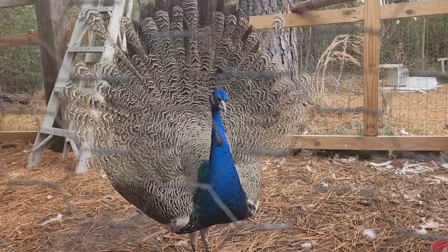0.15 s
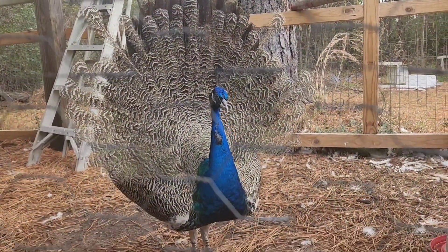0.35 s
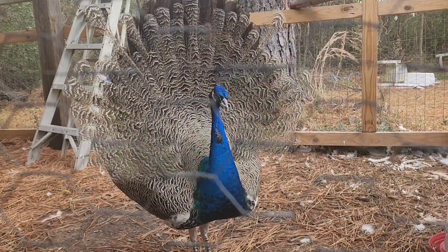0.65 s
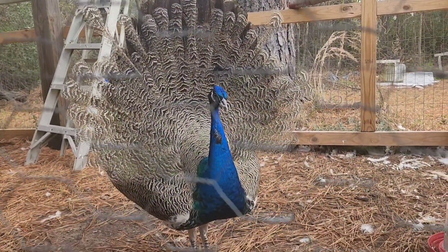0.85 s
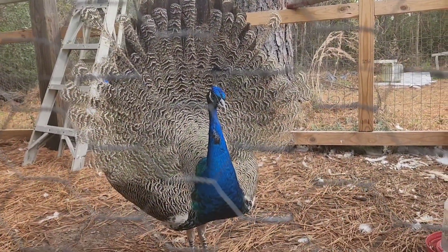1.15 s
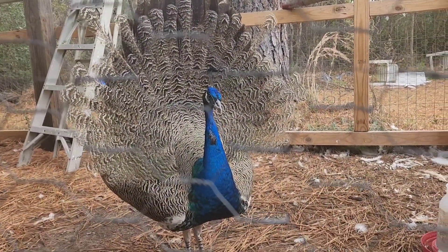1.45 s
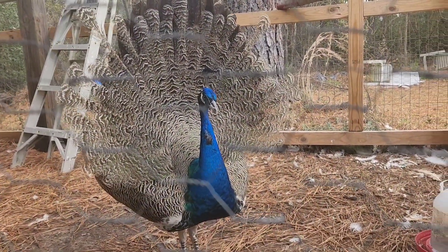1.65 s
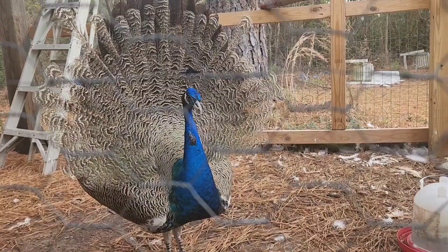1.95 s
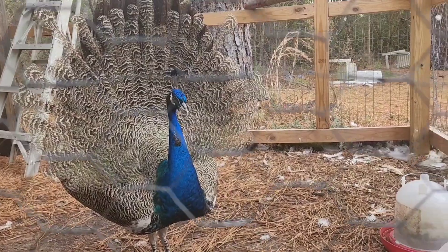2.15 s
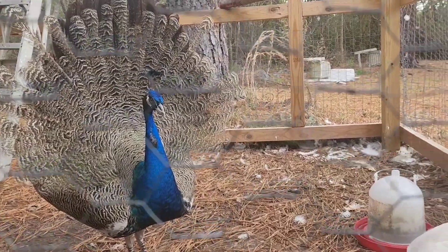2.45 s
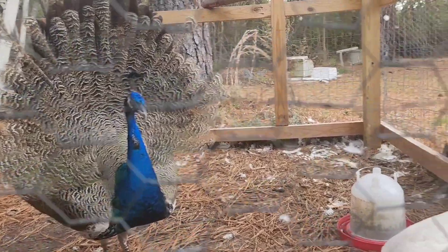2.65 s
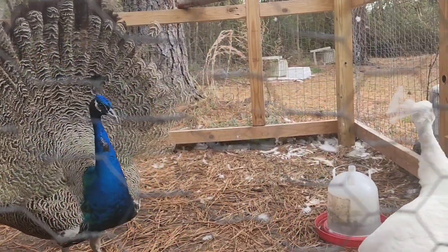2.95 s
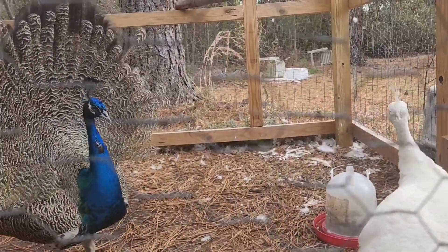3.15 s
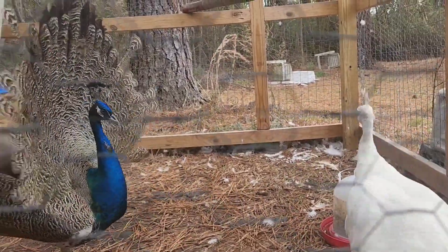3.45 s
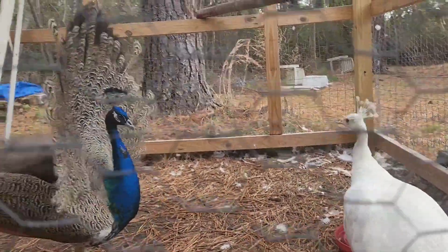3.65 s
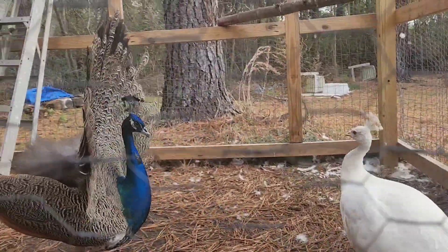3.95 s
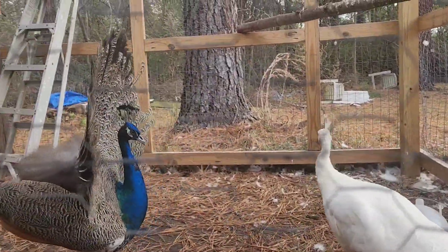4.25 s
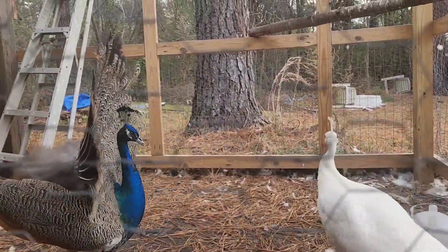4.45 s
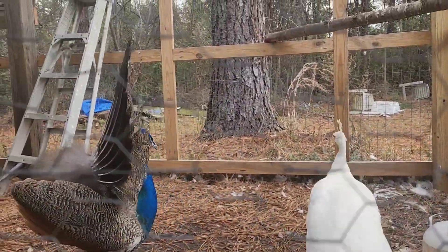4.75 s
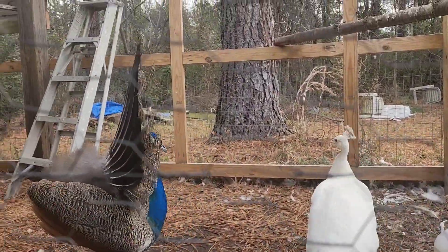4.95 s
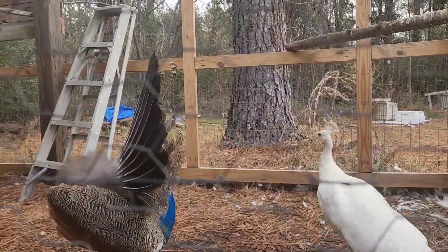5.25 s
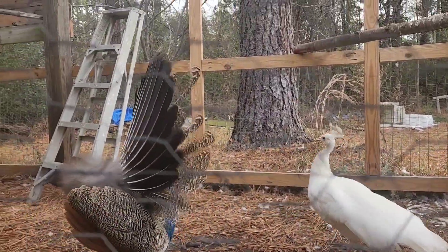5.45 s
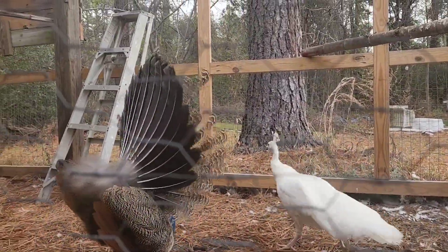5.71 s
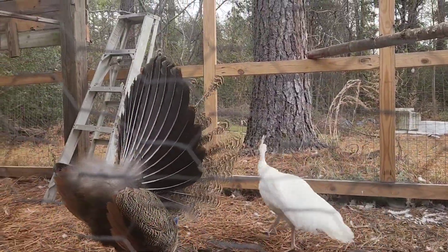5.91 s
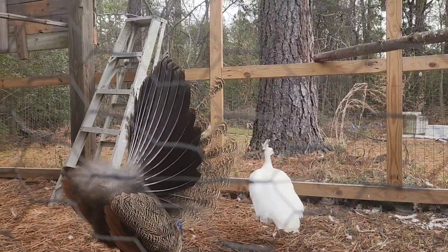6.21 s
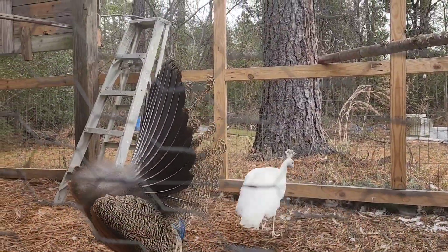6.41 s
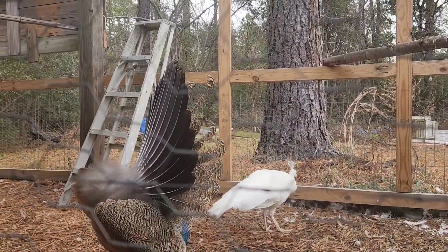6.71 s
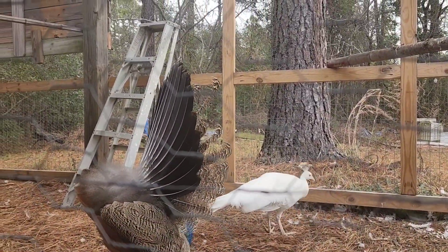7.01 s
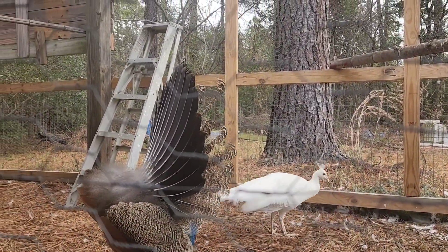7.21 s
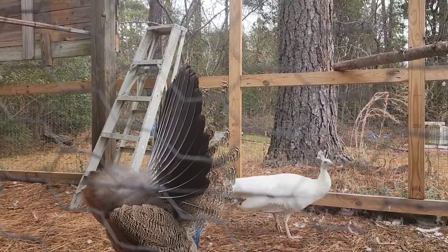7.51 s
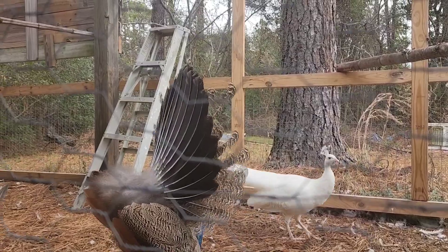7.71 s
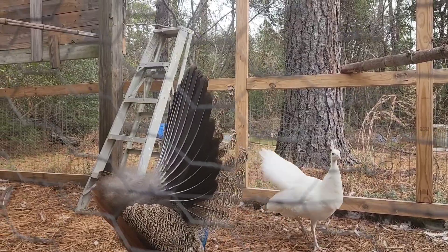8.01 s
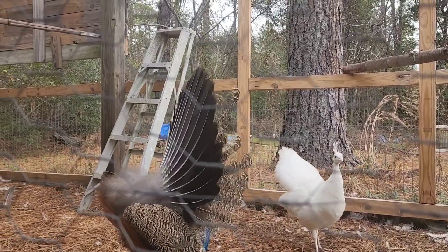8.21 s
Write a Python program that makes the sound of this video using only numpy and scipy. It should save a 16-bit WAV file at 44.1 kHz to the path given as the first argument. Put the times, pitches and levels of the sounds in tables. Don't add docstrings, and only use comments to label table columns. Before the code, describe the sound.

Close soft clucking in an outdoor pen leads to a raspy drawn-out groan and shaken feathers, followed by thin distant chirps and engine drone.

```python
import sys
import numpy as np
from scipy import signal
from scipy.io import wavfile

SR = 44100
rng = np.random.default_rng(int(sys.argv[2]) if len(sys.argv) > 2 else 0)


def waveform_to_disk(signal):
    frames = np.transpose(np.atleast_2d(signal))
    scaled = np.clip(frames, -1, 1) * 32767
    samples = np.round(scaled).astype(np.int16)
    wavfile.write(sys.argv[1], SR, samples)


def volts(x):
    e = np.asarray(x, float) / 20
    return 10 ** e


N = 369116


def rms_one(x):
    return x / np.sqrt(np.mean(x ** 2) + 1e-20)


def in_time(rows, t):
    s, *columns = np.transpose(rows)
    return [np.interp(t, s, column) for column in columns]


def at_hz(points, hz):
    points_hz, values = np.array(points).T
    return np.interp(np.log(hz), np.log(points_hz + 1), values)


def drift(rate, size=N):
    r = np.exp(-80 * np.pi * rate / SR)
    slow = signal.lfilter([1], [1, -2 * r, r * r], rng.standard_normal(size // 40 + 1002))
    settled = rms_one(slow)[1000:]
    return np.interp(np.arange(size) / 40, np.arange(len(settled)), settled)


def resonate(x, hz, width_hz):
    r = np.exp(-np.pi * width_hz / SR)
    gain = (1 - r * r) / 2
    return signal.lfilter(np.array([1, 0, -1]) * gain, [1, -2 * r * np.cos(2 * np.pi * hz / SR), r * r], x)


def add(out, s, sound, pan_db):
    i = max(round(s * SR), 0)
    size = min(len(sound), N - i)
    sides = volts(np.multiply.outer([.5, -.5], pan_db + 0 * sound))
    out[:, i:i + size] += (sound * sides)[:, :size]


def bouts(rows, t, rest_db, rise_db_per_s, fall_db_per_s):
    s, hold, db = np.transpose(rows)[:, :, None]
    rise = rise_db_per_s * np.maximum(s - t, 0)
    fall = fall_db_per_s * np.maximum(t - s - hold, 0)
    return np.maximum((db - rise - fall).max(axis=0), rest_db)


def glides(rows, swell_db, skew, bend=1):
    u = np.linspace(0, 1, num=6)
    arch_db = swell_db * np.log10(np.sin(np.pi * u ** skew) + 0.41)
    return [np.transpose([s + length * u, start_hz + (end_hz - start_hz) * u ** bend, db + arch_db])
            for s, length, start_hz, end_hz, db in rows]


def voice(hz, harmonics_db, jitter, rough, rough_hz):
    size = len(hz)
    phase = 2 * np.pi * np.cumsum(hz * (1 + jitter * drift(37.2, size=size))) / SR
    rough = np.clip(rough, 0, 1)
    out = 0
    for k, db in enumerate(harmonics_db):
        shaken = np.sqrt(1 - rough ** 2) + rough * drift(rough_hz, size=size)
        out = out + volts(db) * np.sin((k + 1) * phase + k * k) * shaken
    return out


def calls(out, tables, harmonics_db, jitter, rough, rough_hz, edge_s, pan_db):
    for rows in tables:
        t = np.arange(rows[0][0], rows[-1][0], 1 / SR)
        hz, db = in_time(rows, t)
        ends = np.clip(np.minimum(t - t[0], t[-1] - t) / edge_s, 0, 1)
        sung = voice(hz, harmonics_db, jitter, rough, rough_hz)
        add(out, t[0], np.sqrt(2) * volts(db) * ends * sung, pan_db)
    return out


# frequency in Hz, left-right likeness from -1 to 1.
SIDE_LIKENESS = [(60, 0.97), (130, 0.93), (290, 0.9), (640, 0.33), (1410, 0.18), (3100, -0.22),
                 (6820, 0.48), (15000, -0.71)]
# frequency in Hz, left minus right in dB.
SIDE_LEAN = [(60, 1), (110, -0.5), (200, 1), (380, 1.5), (700, 2), (1290, 3.5), (2380, 0), (4400, 0.5),
             (8120, 5), (15000, 14)]


def banded_noise(layers, patchy_db):
    out, edges = 0, 25 * 2 ** np.arange(0, 9.5, .36)
    centres = np.sqrt(edges[1:] * edges[:-1])
    norms = [np.sum(volts(2 * at_hz(shape, centres)) * np.diff(edges)) for shape, gain in layers]
    white = rng.standard_normal((2, 2, N))
    for k, hz in enumerate(centres):
        band = signal.butter(2, edges[k:k + 2], "band", fs=SR, output="sos")
        mid, side = signal.sosfilt(band, white[k % 2])
        power = sum(volts(2 * at_hz(shape, hz)) / norm * gain ** 2
                    for (shape, gain), norm in zip(layers, norms))
        alike = np.clip(at_hz(SIDE_LIKENESS, hz), -.99, .995)
        pair = np.sqrt(1 + alike) * mid + np.sqrt(1 - alike) * side * [[1], [-1]]
        lean = volts(at_hz(SIDE_LEAN, hz) * np.array([[.5], [-.5]]))
        out = out + np.sqrt(power * SR / 4) * volts(patchy_db * drift(11.0)) * pair * lean
    return out


# frequency in Hz, density in dB per Hz.
RUMBLE_SPECTRUM = [(12, -34), (20, 0), (63, 3.5), (126, -4.5), (201, -17.5), (261, -25), (331, -17),
                   (400, -27), (520, -73), (880, -120)]
MURMUR_SPECTRUM = [(100, 1.5), (180, -4.5), (400, -1.5), (900, -7), (2000, -19), (4000, -104)]
RUSTLE_SPECTRUM = [(300, -23.5), (600, -7.5), (1200, -4), (2100, -2), (2600, -3), (3500, -4.5), (5500, -4),
                   (8500, -7), (12000, -11.5), (15500, -17.5)]
STILL_SPECTRUM = [(150, -17), (250, -24), (700, 8.5), (2200, -2), (2700, -4.5), (4000, -1.5), (6000, -6),
                  (7800, 2.5), (9000, -9), (10000, -43), (16000, -34)]
# start in seconds, hold in seconds, level in dB.
GUSTS_ON_PORTS = [
    (0.01, 5.8, -53),
    (3.8, .05, -51.5),
    (5.27, 0.054, -49),
]
# start in seconds, hold in seconds, level in dB.
FLOCK_STIRS = [
    (0.01, 0.59, -57),
    (1.35, 0.38, -60),
    (2.24, 0.016, -52.5),
    (2.4, 0.34, -59.5),
    (3.8, 0.16, -47),
    (4.1, 0.65, -52),
    (5.17, .12, -62),
    (5.5, 0.27, -65.5),
    (8.11, 0.056, -70.5),
]
# time in seconds, rustle in dB.
FEATHER_SHAKE = [(0.5, -82), (1.05, -99.5), (1.26, -73), (1.45, -67), (1.68, -70.5), (2.33, -99),
                 (2.56, -71.5), (2.82, -68), (3.08, -62.5), (3.7, -51), (4.9, -54), (5.97, -52.5),
                 (6.24, -76), (7.6, -89), (7.76, -69), (7.92, -59), (8.3, -54.5)]
# start in seconds, hold in seconds, level in dB.
QUILL_SWISHES = [
    (1.71, 0.051, -65),
    (2.45, 0.021, -70.5),
    (2.66, 0.052, -61),
    (2.9, .02, -64.5),
    (3.08, 0.048, -59),
    (3.335, 0.011, -48),
    (6.67, 0.044, -68.5),
    (6.875, 0.019, -71),
    (7.58, .01, -75),
]


def air():
    t = np.arange(N) / SR
    throb = 1 + 0.076 * np.sin(2 * np.pi * np.cumsum(46.0 + 2.1 * drift(7.0)) / SR)
    gust_db = bouts(GUSTS_ON_PORTS, t, rest_db=-54.5, rise_db_per_s=13, fall_db_per_s=8)
    stir_db = bouts(FLOCK_STIRS, t, rest_db=-71.5, rise_db_per_s=35, fall_db_per_s=59)
    swish_db = bouts(QUILL_SWISHES, t, rest_db=-120, rise_db_per_s=900, fall_db_per_s=350)
    rumble = volts(gust_db + 1.0)
    murmur = volts(stir_db + 1.5 + 2.2 * drift(12))
    shaken = volts(in_time(FEATHER_SHAKE, t)[0] + 7.0 + 0.14 * drift(2.0) + 0.83 * drift(43)) * throb
    rustle = np.hypot(shaken, volts(swish_db + 3.5))
    layers = [(RUMBLE_SPECTRUM, rumble), (MURMUR_SPECTRUM, murmur), (RUSTLE_SPECTRUM, rustle),
              (STILL_SPECTRUM, volts(-71.5))]
    return banded_noise(layers, patchy_db=1.34)


# start in seconds, length in seconds, start pitch in Hz, end pitch in Hz, peak in dB.
HEN_MOANS = [
    [(0.001, 0.24, 439, 394, -60), (.22, .19, 385, 384, -55.5), (.45, 0.31, 393.5, 364, -56.5),
     (.75, 0.24, 365, 350, -62), (1.7, 0.2, 396, 430, -62), (1.96, 0.19, 425, 406, -56),
     (2.39, 0.046, 397, 390, -60)],
    [(.1, 0.3, 521, 560, -64.5), (.42, 0.18, 540, 603, -59.5), (.565, 0.075, 690, 593, -53)],
]
HEN_HARMONICS_DB = [
    [0.5, -4, -26.5],
    [1.5, -10, -12, -20.5],
]


def moans():
    out = np.zeros((2, N))
    for rows, harmonics_db in zip(HEN_MOANS, HEN_HARMONICS_DB):
        lines = glides(rows, swell_db=3.5, skew=1.6)
        out = calls(out, lines, harmonics_db, jitter=.014, rough=.4, rough_hz=22, edge_s=.03, pan_db=3)
    return out


# time in seconds, peak in dB, pitch in Hz, throat in Hz, breath in dB against the voice.
SOFT_CLUCKS = [(0.157, -40, 258, 430, -16), (0.351, -36, 304, 740, -11), (0.489, -37, 311, 510, -12),
               (0.632, -41, 290.5, 560, -10), (0.828, -41, 233, 455, -43), (0.922, -33, 264.5, 453.5, -41),
               (1.026, -34.5, 244.3, 463, -44), (1.152, -37.5, 246.4, 497, -25),
               (1.266, -38, 189.7, 420, -21), (1.392, -40, 207, 420, -13.5), (1.523, -41, 365, 401, -27),
               (1.603, -44, 360, 732, -18), (1.649, -39.5, 235.3, 480, -13),
               (1.784, -39.5, 255, 420, -10.5), (1.907, -42, 251.4, 460, -37), (2.361, -43.5, 217, 470, -5),
               (2.522, -42.5, 245, 720, -11), (2.614, -38, 168.2, 400, -28), (2.722, -37.5, 175, 408, -15),
               (2.953, -34.5, 270, 725, -10), (3.275, -45, 300, 444, -11)]
# time in seconds, peak in dB, throat in Hz, length in seconds.
HIGH_CLUCKS = [(0.104, -47, 1110, 0.03), (0.19, -48, 1150, 0.033), (.113, -48, 800, .03),
               (.215, -47, 810, .03), (1.533, -42.5, 1150, 0.039), (1.535, -44, 770, 0.028),
               (1.703, -43, 840, 0.017), (1.92, -45.5, 840, .045), (1.81, -49, 750, 0.033),
               (1.868, -48, 850, 0.023), (.16, -53, 1300, 0.046), (0.36, -50, 1560, 0.045),
               (0.62, -52, 1450, 0.019), (1.918, -50, 1620, 0.025), (1.971, -45, 770, 0.029),
               (2.212, -39.5, 590, 0.017), (2.24, -45, 452, 0.026), (3.087, -52, 1152, 0.043),
               (3.201, -43, 1400, 0.055), (3.42, -41.5, 970, 0.029), (3.525, -41.5, 1070, 0.05),
               (3.59, -41.5, 440, 0.046), (3.095, -56, 1500, .03), (2.415, -48.5, 764, 0.031),
               (2.955, -45, 1350, 0.036), (1.29, -43.5, 540, 0.033), (1.175, -48.5, 690, 0.031),
               (1.7, -44, 370, .04), (3.713, -35.5, 1390, 0.026), (3.889, -35.5, 1925, 0.046),
               (3.893, -42, 1245, 0.038), (5.612, -42, 630, 0.013)]


def clucks():
    out = np.zeros((2, N))
    rows = [(*row, .054, .24) for row in SOFT_CLUCKS]
    rows += [(s, db, hz, hz, -14, length, .08) for s, db, hz, length in HIGH_CLUCKS]
    for s, db, pitch_hz, throat_hz, breath_db, length, arch in rows:
        u = np.linspace(0, 1, int(np.clip(length, .01, .1) * SR))
        partial_hz = pitch_hz * np.arange(1, 6)
        lift_db = 17 / (1 + ((partial_hz - throat_hz) / (.22 * throat_hz)) ** 2)
        shape_db = lift_db - 13 * np.log2(partial_hz / pitch_hz)
        arched_hz = pitch_hz * (1 + arch * (np.sin(np.pi * u ** .9) - .8))
        tone = voice(arched_hz, shape_db, jitter=.025, rough=.35, rough_hz=60)
        hiss = rng.standard_normal(len(u))
        breath = resonate(resonate(hiss, 1400, 550), 1150, 800)
        rasp_hz = 0.67 * throat_hz
        rasp = resonate(resonate(hiss, rasp_hz, 245), rasp_hz, 245)
        puff = rms_one(tone) + volts(-8.5) * rms_one(rasp) + volts(breath_db) * rms_one(breath)
        puff = puff * np.sin(np.pi * u ** 0.8) ** 1.23
        add(out, s - .013, volts(db + 0.17) * puff / np.abs(puff).max(), 1.1)
    return out


# time in seconds, peak in dB, centre in Hz.
TWIG_TICKS = [(0.856, -45.5, 6400), (2.1288, -51, 9200), (2.1295, -50, 12500), (2.2684, -46, 3000),
              (2, -48, 7500), (2, -45, 8000), (2.329, -49, 8600), (2.162, -47, 9100), (2.2736, -36.5, 4500),
              (2.2844, -52, 4500), (2.3243, -48, 5070), (2.2935, -52, 4000), (7.5288, -45, 4200),
              (7.581, -62, 8200), (7.683, -60, 7700), (7.531, -59, 8300), (7.736, -54, 9000),
              (7.754, -58, 8000), (7.7443, -42, 9000)]
# time in seconds, peak in dB, centre in Hz.
QUILL_SNAPS = [(2.5475, -61, 7560), (2.6567, -53, 5510), (2.6897, -49, 5080), (2.8887, -52, 5150),
               (3.3372, -39, 5750), (4.5026, -39, 6490), (6.4377, -66, 7210), (6.4701, -62, 7810),
               (6.8692, -61, 6410), (6.9206, -62, 7420), (6.9545, -62, 5390), (7.0577, -63, 8140),
               (7.3685, -55, 7310), (7.4957, -68, 7760), (7.5287, -60, 5220), (7.5806, -61, 7830),
               (7.6813, -58, 8220), (7.7446, -42, 9200)]
# time in seconds, peak in dB, centre in Hz.
PEN_KNOCKS = [
    (2.27, -42, 2280),
    (1.9, -47.5, 655),
    (2.68, -44.5, 1770),
    (2.688, -45, 1600),
    (2, -46, 1160),
    (7.638, -54, 900),
    (7.639, -57, 1500),
    (2.1, -45, 780),
    (7.802, -49, 880),
    (7.924, -51, 680),
]
# time in seconds, peak in dB, centre in Hz.
LITTER_SCUFFS = [(2.325, -46.5, 3700), (2.1, -51, 2100), (2.938, -45, 3500), (2.3, -53, 1340),
                 (6.452, -55, 950), (6.878, -64, 2000), (0.38, -56, 3800), (2.6, -52.5, 3100),
                 (5.5, -60, 910), (7, -66, 1150), (3.1, -54, 1400), (1.8, -50.5, 870), (7.92, -51.5, 300),
                 (3.635, -39.5, 250), (3.78, -38, 214)]
# time in seconds, peak in dB, centre in Hz.
WING_THUMPS = [(3.3, -41, 215), (4.9, -40, 213), (5.125, -46, 327), (5.18, -42.5, 180), (5.218, -38.5, 170),
               (5.245, -40.5, 247), (5.295, -40.5, 250), (5.405, -50, 302), (5.77, -52.5, 280),
               (2.48, -54, 200), (5.36, -44.5, 300), (5.495, -52.5, 257), (6.105, -45, 274)]


def ticks():
    out = np.zeros((2, N))
    t = np.arange(round(.08 * SR)) / SR
    kinds = ((TWIG_TICKS, .0009, 8), (QUILL_SNAPS, .0009, 6), (PEN_KNOCKS, .003, 1.5),
             (LITTER_SCUFFS, .02, 2.5), (WING_THUMPS, .009, 1.2))
    for rows, decay_s, pan_db in kinds:
        for s, db, hz in rows:
            snap = rng.standard_normal(len(t)) * np.exp(-t / decay_s) * np.tanh(2 * t / decay_s)
            for width in (0.8, 1.02, 1.3):
                snap = resonate(snap, hz, width * hz)
            snap = signal.sosfilt(signal.butter(6, 1.2 * hz, fs=SR, output="sos"), snap)
            add(out, s, volts(db) * snap / np.abs(snap).max(), pan_db)
    return out


# time in seconds, weak fundamental in Hz, level in dB.
SQUEAK_LINES = [
    [(.515, 2650, -66), (.535, 2570, -54), (.556, 2490, -42.5), (.595, 2440, -45), (.615, 2340, -50),
     (.64, 2240, -62), (.675, 2290, -71)],
    [(.598, 1990, -58), (.61, 1905, -52), (.624, 1834, -50), (.635, 1830, -64), (.665, 1830, -68)],
]
SQUEAK_HARMONICS_DB = [-21, 0, -29, -20]


def squeak():
    out = calls(np.zeros((2, N)), SQUEAK_LINES, SQUEAK_HARMONICS_DB,
                jitter=.008, rough=.35, rough_hz=300, edge_s=.012, pan_db=-7.5)
    buzz = 2 * np.pi * np.cumsum(290 * (1 + .08 * drift(30))) / SR
    return out * (.8 + .8 * np.sin(buzz) + .15 * np.sin(2 * buzz))


# start in seconds, length in seconds, start pitch in Hz, end pitch in Hz, peak in dB.
THIN_WHISTLES = [(1.582, 0.044, 3750, 3600, -52.5), (1.648, 0.06, 3460, 3330, -62.5),
                 (1.71, 0.12, 3350, 3100, -68), (6.53, 0.065, 3460, 3120, -59.5),
                 (6.7, 0.048, 3200, 3060, -56), (6.65, 0.039, 3220, 3170, -61),
                 (7.585, 0.1, 3730, 3500, -66.5), (7.79, .085, 3520, 3470, -61),
                 (3.43, 0.036, 1990, 1920, -54), (1.31, 0.16, 2080, 2174, -73),
                 (1.33, 0.06, 1600, 1730, -70), (1.42, .05, 3200, 3260, -69)]


def whistles():
    lines = glides(THIN_WHISTLES, swell_db=11, skew=0.68)
    return calls(np.zeros((2, N)), lines, [0], jitter=.008, rough=.35, rough_hz=70, edge_s=.012, pan_db=5)


# time in seconds, pitch in Hz, level in dB.
LOUD_CLUCKS = [
    [(2.037, 260, -41), (2.043, 273.3, -41.5), (2.054, 272, -29), (2.06, 290, -46), (2.072, 250, -51)],
    [(2.13, 287, -42), (2.134, 324.5, -42), (2.145, 334, -45), (2.156, 260, -42), (2.164, 233, -72)],
]
LOUD_HARMONICS_DB = [-15, 4.5, -13, -5.5, -11.5, -20, -30, -26]
# start in seconds, hold in seconds, level in dB.
BEAK_SPITS = [
    (2.045, 0.012, -48),
    (2.135, .004, -53.5),
    (2.157, .004, -62),
    (2.113, .004, -62),
]


def loud_clucks():
    out = calls(np.zeros((2, N)), LOUD_CLUCKS, LOUD_HARMONICS_DB,
                jitter=.015, rough=.3, rough_hz=120, edge_s=.003, pan_db=3)
    for rows in LOUD_CLUCKS:
        t = np.arange(rows[0][0], rows[-1][0], 1 / SR)
        breath = resonate(resonate(rng.standard_normal(len(t)), 1150, 700), 1300, 1200)
        level = volts(in_time(rows, t)[1] - 14) * np.linspace(.3, 1.5, len(t))
        add(out, t[0], level * rms_one(breath), 1.5)
    t = np.arange(2, 2.25, 1 / SR)
    beak = signal.butter(4, [3200, 8200], "band", fs=SR, output="sos")
    hiss = resonate(signal.sosfilt(beak, rng.standard_normal(len(t))), 4100, 3500)
    spit_db = bouts(BEAK_SPITS, t, rest_db=-120, rise_db_per_s=2500, fall_db_per_s=1300)
    add(out, t[0], volts(spit_db) * rms_one(hiss), 1.5)
    return out


# start in seconds, length in seconds, start pitch in Hz, end pitch in Hz, peak in dB.
BIRD_CHIRPS = [(3.165, 0.061, 4610, 2900, -50.5), (4.57, 0.05, 3600, 2810, -51),
               (5.512, 0.052, 3570, 2740, -49), (5.672, 0.064, 3710, 2730, -48.5),
               (5.724, .018, 3150, 3250, -53), (6.824, 0.018, 2330, 4200, -63),
               (6.838, 0.021, 4090, 4190, -54), (6.853, 0.029, 4200, 2780, -58),
               (6.88, 0.021, 3120, 2950, -62), (6.902, 0.074, 4020, 2340, -55),
               (7.03, 0.084, 3930, 2750, -51), (7.196, 0.09, 3890, 2760, -51),
               (7.484, 0.091, 3980, 2630, -56.5), (7.664, 0.095, 3940, 2570, -53)]


def chirps():
    lower = glides(BIRD_CHIRPS, swell_db=24, skew=.68, bend=1.25)
    upper = [rows + [0, 400, -13] for rows in lower]      # s, Hz, dB
    out = calls(np.zeros((2, N)), lower, [0, -32],
                jitter=.008, rough=.28, rough_hz=90, edge_s=.003, pan_db=3)
    return calls(out, upper, [3, -13], jitter=.015, rough=.65, rough_hz=250, edge_s=.003, pan_db=3)


GROAN_SPAN_S = (3.47, 4.95)
SUNG_PITCHES_HZ = (550, 614)
# start in seconds, hold in seconds, lower oscillator in dB, upper oscillator in dB.
SUNG_BURSTS = [
    (3.5, .005, -48, -64),
    (3.789, .005, -36, -63),
    (3.91, .005, -32, -45),
    (4.015, .005, -41, -63),
    (4.07, 0.11, -38, -40.5),
    (4.221, 0.0039, -29.5, -34.5),
    (4.288, 0.077, -35, -37),
    (4.411, 0.026, -31, -54),
    (4.48, .43, -53.5, -54.5),
]
# time in seconds, rasp in dB, overtone in Hz.
GROAN_RASP = [
    (3.45, -76, 990),
    (3.53, -54, 1032),
    (3.68, -49.5, 961),
    (3.813, -44, 922),
    (3.97, -43, 988),
    (4.35, -43.5, 926),
    (4.45, -43.5, 1010),
    (4.655, -43.5, 881),
    (4.82, -77, 876),
    (4.97, -84, 910),
]
# frequency in Hz, width in Hz, level in dB.
THROAT_RESONANCES = [(560, 200, 0), (728, 100, 1), (801, 110, 0.5), (979, 120, 4), (1433, 77, -4),
                     (1950, 180, -28)]
# time in seconds, pitch in Hz, level in dB.
GROAN_SAG = [
    (4.45, 440, -44.5),
    (4.894, 378.8, -51.5),
    (4.96, 358, -67),
]


def groan():
    out = np.zeros((2, N))
    t = np.arange(*GROAN_SPAN_S, 1 / SR)
    s, hold, *levels = np.transpose(SUNG_BURSTS)
    for hz, peak_db in zip(SUNG_PITCHES_HZ, levels):
        bursts = np.transpose([s, hold, peak_db])
        db = bouts(bursts, t, rest_db=-81, rise_db_per_s=352, fall_db_per_s=500)
        sung = voice(hz + 0 * t, [0], jitter=.024, rough=.5, rough_hz=40)
        add(out, t[0], np.sqrt(2) * volts(db) * sung, -3.5)
    t = np.arange(GROAN_RASP[0][0], GROAN_RASP[-1][0], 1 / SR)
    rasp_db, overtone_hz = in_time(GROAN_RASP, t)
    cycles = np.cumsum(62 * (1 + .12 * drift(30, size=len(t)))) / SR
    pulses = np.diff(np.floor(cycles), prepend=0) * volts(2.4 * rng.standard_normal(len(t)))
    source = rms_one(pulses) + 0.92 * rng.standard_normal(len(t))
    rasp = sum(volts(db) * resonate(resonate(source, hz, width_hz), hz, width_hz)
               for hz, width_hz, db in THROAT_RESONANCES)
    overtone = voice(overtone_hz, [0], jitter=0.0253, rough=0.47, rough_hz=45)
    add(out, t[0], volts(rasp_db) * (volts(1.5) * rms_one(rasp) + volts(-1.0) * overtone), 1.2)
    out = calls(out, [GROAN_SAG], [0, -3],
                jitter=0.0325, rough=1.0, rough_hz=55.95, edge_s=0.038, pan_db=1.0)
    lag_s = .00017
    out[1] = np.interp(np.arange(N) - lag_s * SR, np.arange(N), out[1])
    return out


# time in seconds, second order in dB, third order in dB.
ENGINE_LOAD = [
    (4.9, -55, -91),
    (6.23, -65.5, -56.5),
    (7.56, -47.5, -47),
    (8.37, -59, -62.5),
]


def engine():
    t = np.arange(N) / SR
    second_db, third_db = in_time(ENGINE_LOAD, t)
    phase = np.pi * 43.96 * t
    fade_db = np.interp(t, [3.5, 4.8], [-25, 0])
    orders = [(2, second_db + 5.5), (3, third_db + 0.5), (4, third_db - 20.0), (5, third_db - 13.5)]
    return sum(volts(db + fade_db + drift(2.8)) * np.sin(k * phase) for k, db in orders)


# time in seconds, pitch in Hz, level in dB.
FAR_HEN = [
    [(6.41, 668, -68), (6.45, 600, -69), (6.475, 533, -65), (6.5, 560, -63), (6.6, 560, -66)],
    [(6.57, 560, -79), (6.63, 570, -67), (6.69, 569, -63), (6.76, 572, -68), (6.8, 517, -76)],
]
FAR_HARMONICS_DB = [
    [0, -5, -11, -24],
    [-8, 0, -2, -6],
]


def far_moan():
    closed = calls(np.zeros((2, N)), FAR_HEN[:1], FAR_HARMONICS_DB[0],
                   jitter=.025, rough=.55, rough_hz=45, edge_s=.02, pan_db=5)
    opened = calls(np.zeros((2, N)), FAR_HEN[1:], FAR_HARMONICS_DB[1],
                   jitter=.02, rough=.45, rough_hz=45, edge_s=.02, pan_db=5)
    flutter = 1 + 0.6 * np.sin(2 * np.pi * 31 * np.arange(N) / SR)
    return closed + opened * flutter


def wood(x, t60):
    t = np.arange(round(.5 * SR)) / SR
    hits = rng.random((2, len(t))) < .03
    echoes = rng.standard_normal((2, len(t))) * hits * volts(-60 * t / t60) * (t > .007)
    echoes = echoes / np.sqrt(np.sum(echoes ** 2, axis=1, keepdims=True))
    return signal.fftconvolve(x.mean(axis=0)[None], echoes)[:, :N]


def scene():
    near = moans() + clucks() + ticks() + loud_clucks() + groan() + far_moan()
    far = squeak() + whistles() + chirps()
    echoes = volts(-9) * wood(near + volts(0.5) * far, t60=0.085) + volts(-15) * wood(far, t60=.3)
    return near + far + echoes + air() + engine()


def roll_off(x):
    return signal.sosfilt(signal.butter(12, 15790, fs=SR, output="sos"), x)


# frequency in Hz, width in Hz, share added.
CAPSULE = [
    (10300, 2400, -.55),
    (12750, 1300, 1.05),
    (2150, 300, .35),
    (2650, 300, -.4),
]


def record(dry):
    port_lag_s = -0.0000876
    left = np.interp(np.arange(N) - port_lag_s * SR, np.arange(N), dry[0])
    x = np.array([left, dry[1]])
    for hz, width_hz, share in CAPSULE:
        x = x + share * resonate(x, hz, width_hz)
    top_cut = signal.cheby2(20, 66, 16900, fs=SR, output="sos")
    mix = signal.sosfilt(top_cut, x)
    return roll_off(mix)


dry = scene()
out = record(dry)
waveform_to_disk(out)
```